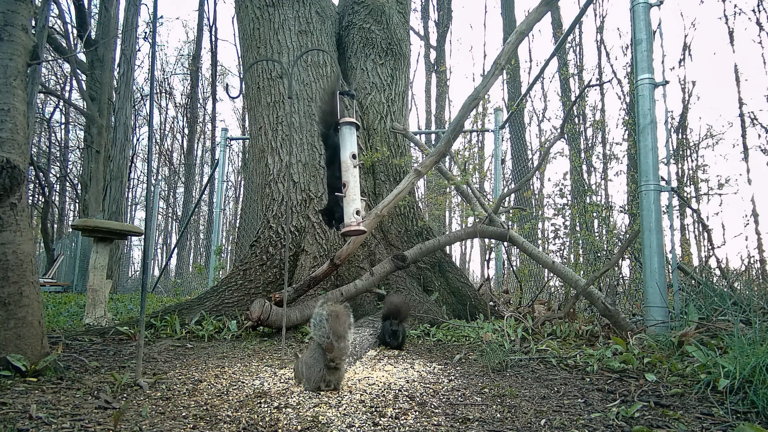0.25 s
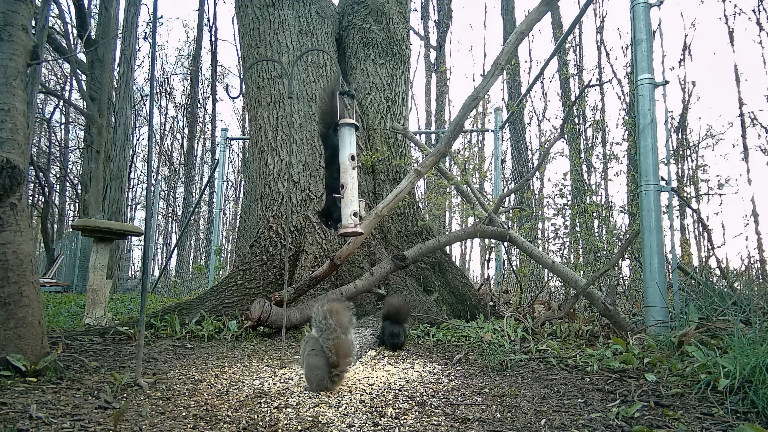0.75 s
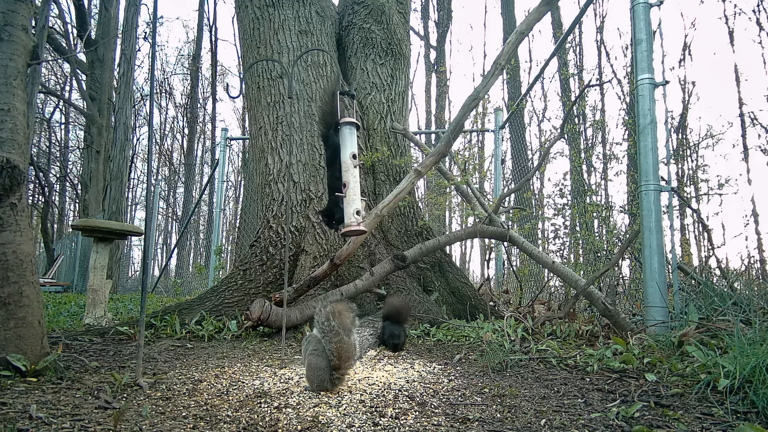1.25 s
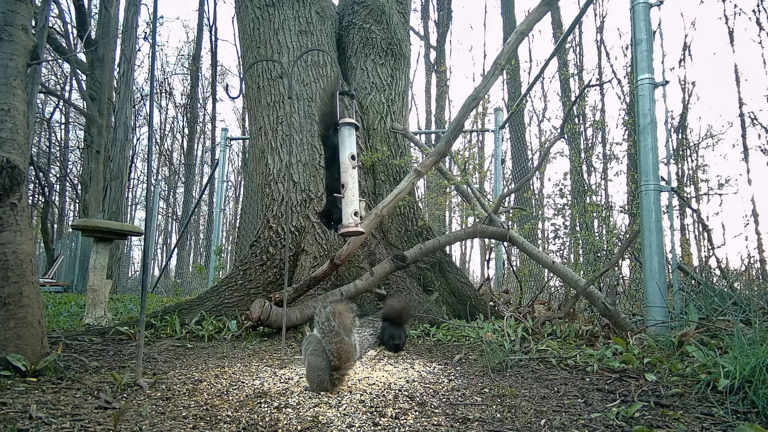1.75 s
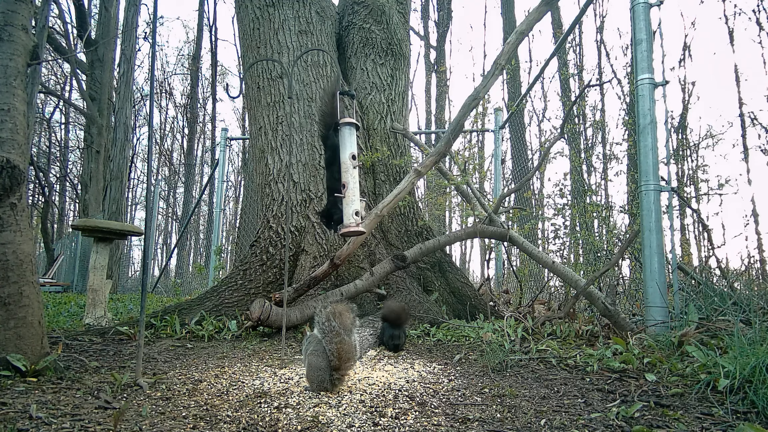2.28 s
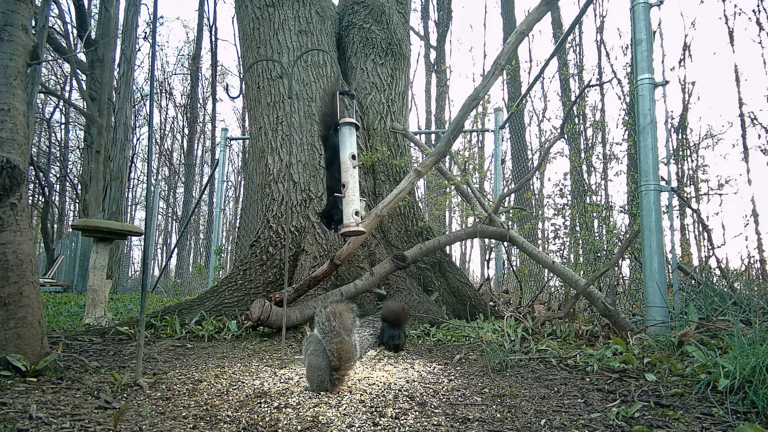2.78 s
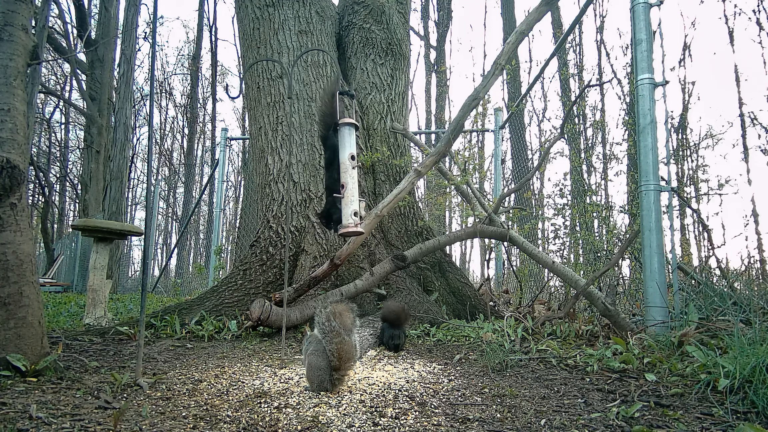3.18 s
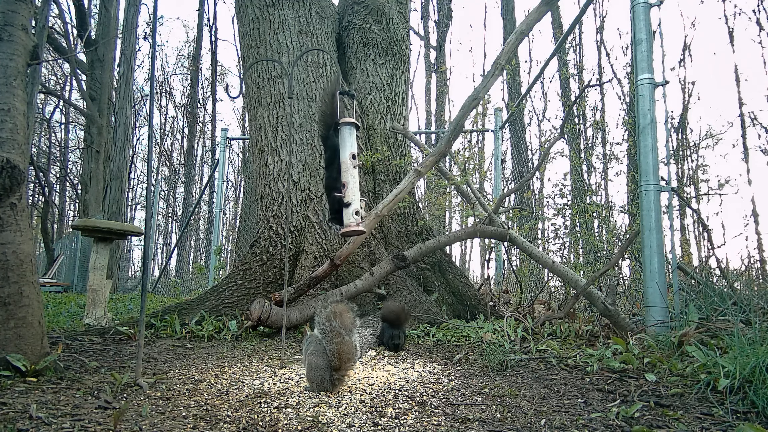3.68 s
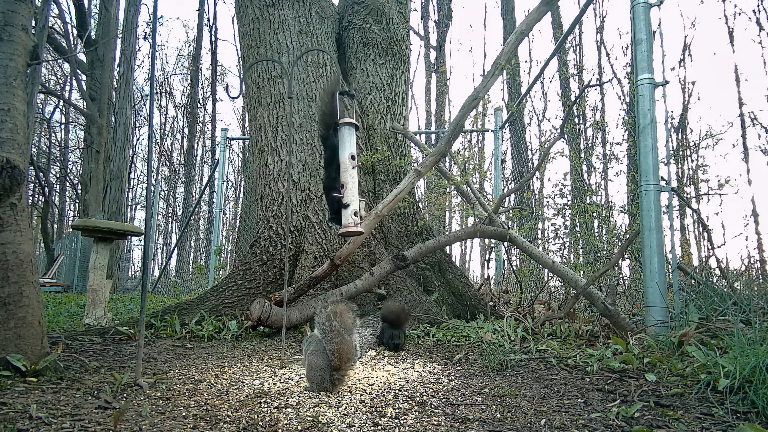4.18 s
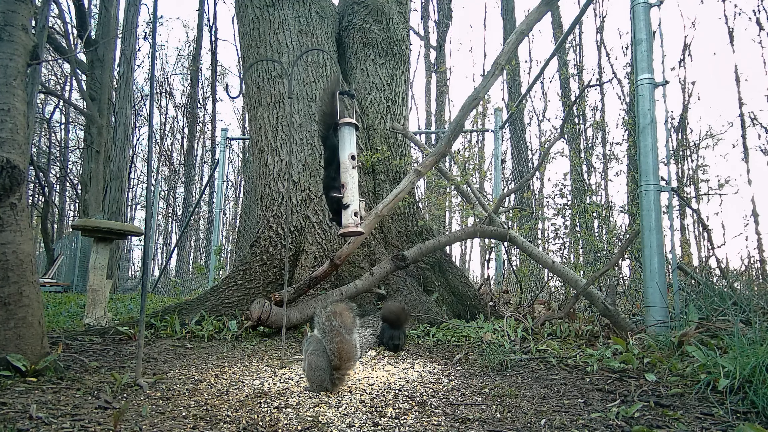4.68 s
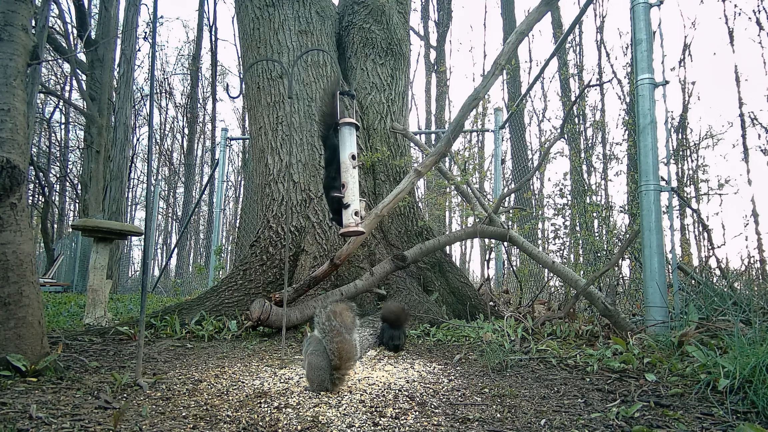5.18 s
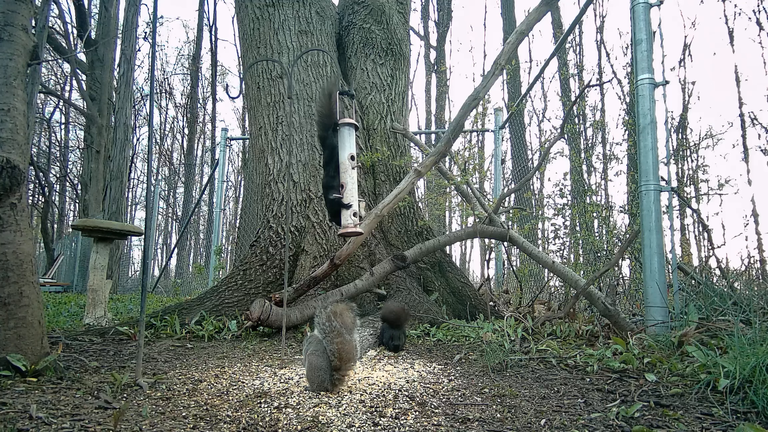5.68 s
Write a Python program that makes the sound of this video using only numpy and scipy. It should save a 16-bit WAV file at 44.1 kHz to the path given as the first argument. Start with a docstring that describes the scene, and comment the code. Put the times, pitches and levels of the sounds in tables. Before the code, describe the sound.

Distant road traffic rumbles steadily beyond a wood while squirrels close by crack seeds with a few small, sharp clicks.

```python
"""A road some way off, heard from a feeding place in a wood.
Rolling tyres make a steady wash over the low rumble of many engines. Single exhaust notes swell
and fade, and a lorry comes out from behind the trees, slowly sinking in pitch.
Close by, squirrels crack seeds and nibble: fibres snap and the husks ring briefly."""
import sys
import numpy as np
from scipy import signal
from scipy.fft import rfft, irfft
from scipy.io import wavfile

SR = 44100
rng = np.random.default_rng(int(sys.argv[2]) if len(sys.argv) > 2 else 0)


def pcm_store(signal):
    """Save signal as 16-bit PCM."""
    levels = np.round(np.clip(np.atleast_2d(signal), -1, 1) * 32767)
    wavfile.write(sys.argv[1], SR, levels.astype(np.int16).T)


N = 261954
TIME = np.arange(N) / SR


def road(flutter_db, throb_db):
    """Tyre wash, dulled by distance, over a rumble that throbs as engines beat together."""
    # tone colour of all the tyres on the road: f/Hz, relative level/dB
    tyre_spectrum = [(240, -32.5), (400, -5), (449, -1.5), (581, -4.5), (890, 0), (1380, -6), (1910, -7.5),
                     (2730, -19.5), (3110, -20.5), (4890, -32.5), (5630, -37), (6240, -39), (7190, -42),
                     (7580, -44.5), (8730, -66), (11300, -88), (19200, -120)]
    # tone colour of many far engines: f/Hz, relative level/dB
    rumble_spectrum = [(15, -22), (28, -10), (40, -9), (54, -3), (75, 1), (105, 0), (150, -2.5),
                       (190, -8.5), (250, -10), (300, -16), (340, -13.5), (385, -25), (500, -32)]
    wash_db = -39 + 0.2371 * TIME  # grows very slowly
    rumble_db = -28 - 4 * np.maximum(.8 - TIME, 0)  # builds up for 0.8 s, then holds
    wash = from_db(wash_db + flutter_db * drift(4.4)) * coloured_noise(tyre_spectrum)
    rumble = from_db(rumble_db + throb_db * drift(5.5)) * coloured_noise(rumble_spectrum)
    return wash + rumble


def exhaust_notes():
    """Single exhaust and engine notes rise out of the rumble and sink back."""
    # one note a row: loudest at t/s, half length/s, f/Hz, pitch glide/(Hz per s), level/dB
    notes = [(0.252, 0.48, 275.4, 1, -46), (.92, 0.2, 328.3, 0, -41), (1.144, 0.28, 84.1, -2.5, -26),
             (1.9, 1.22, 347, .5, -52), (2.252, .55, 83.57, -1, -24), (2.497, 0.56, 637, .5, -51),
             (2.545, 0.57, 134.2, -2.5, -29.5), (3.2, 0.52, 317.4, 0, -48), (3.503, 0.49, 97.16, -1, -35),
             (3.704, 0.66, 448.3, -5.5, -51.5), (3.9, 0.39, 121.8, 0, -33.5), (3.994, 0.22, 233, 1, -35.5),
             (4.0, 0.36, 78.5, 2.5, -32), (4.499, 0.47, 129.6, -2.5, -27.5), (4.578, 0.2, 444, -4, -43),
             (4.699, 0.54, 80.7, 1.5, -24.5), (4.85, 0.32, 306.2, 0.5, -44), (5.201, 0.79, 442.6, 0.5, -51),
             (5.397, 0.21, 329, 0.5, -39), (5.8, 0.19, 86.3, 0, -29)]
    out = np.zeros(N)
    for loudest_s, half_s, hz, glide, level_db in notes:
        offset_s = TIME - loudest_s
        swell = np.cos(np.pi / 2 * np.clip(offset_s / half_s, -1, 1))
        out += from_db(level_db) * swell * far_tone(hz + glide * offset_s, scatter=.2, fade_hz=4)
    return out


def lorry(open_s, hidden_s, roar_db):
    """A slowing engine hums and roars, louder in the open and softer behind the trees."""
    # engine tones: multiple of the engine's turn rate, relative level/dB
    engine_tones = [(4, -8.5), (6, -6), (7, -3.5), (8, -7), (9, -0.5), (10, -7), (12, -11.5), (13, -16)]
    # rough roar of burning fuel: f/Hz, relative level/dB
    roar_spectrum = [(110, -12.5), (160, -4.5), (210, 5), (255, 1), (290, -11), (330, -12.5), (380, -17.5),
                     (600, -30.5)]
    turns_hz = 25.71 - .5 * (TIME - open_s)
    tree_loss_db = 21 * np.maximum(open_s - TIME, 0) + 9 * np.maximum(TIME - hidden_s, 0)
    gain = from_db(-52) + from_db(-29 - tree_loss_db)  # a faint part always gets through
    hum = sum(from_db(db) * far_tone(k * turns_hz, scatter=.3, fade_hz=3) for k, db in engine_tones)
    roar = from_db(roar_db) * coloured_noise(roar_spectrum)
    return gain * (rms_one(hum) + roar)


def squirrels(nibbles_per_s, nibble_db, snap_db, husk_db, echo_db, top_hz):
    """Seed cracks and faint nibbles: fibres snap, the husk rings, ground and trunks echo briefly."""
    # seed cracks: t/s, click level/dB, extra level for the snap and the highest husk tones/dB
    cracks = [(.2940, -29.5, 2.5), (.7098, -55, 5.5), (.9392, -43, -12), (1.4406, -29, -18),
              (1.4495, -51, 4.5), (1.7609, -53, 0), (1.952, -53.5, 0), (1.9579, -48, 2), (3.0111, -57, 1),
              (3.0601, -52, 5), (3.7564, -53, 4), (5.453, -50, -4), (5.9082, -50, -1)]
    # ringing tones of a husk: f/Hz, relative level/dB, time to fade by 60 dB/s
    husk_tones = [(3450, -10, .005), (4200, -14, .004), (5480, -5, .012), (5680, -3, .007),
                  (6650, -4, .004), (7080, -3, .006), (7400, -4, .006)]
    crack_s, click_db, bright_db = np.transpose(cracks)
    starts = (crack_s * SR).astype(int)
    bites = rng.random(N) < nibbles_per_s / SR
    nibbles = bites * from_db(nibble_db + 3 * rng.standard_normal(N))
    low_clicks, high_clicks = nibbles.copy(), nibbles.copy()
    low_clicks[starts] = from_db(click_db)
    high_clicks[starts] = from_db(click_db + bright_db)
    out = from_db(snap_db) * smear(high_clicks, fade_s=.01)
    for k, (hz, level_db, fade_s) in enumerate(husk_tones):
        clicks = high_clicks if hz > 6200 else low_clicks
        out += (-1) ** k * from_db(level_db + husk_db) * ring(clicks, hz, fade_s)
    echo = from_db(echo_db) * smear(out, fade_s=.05)
    return signal.sosfilt(signal.butter(8, top_hz, fs=SR, output="sos"), out + echo)


def far_tone(hz, scatter, fade_hz):
    """A tone arrives by many shifting paths: a steady part plus a part that wavers."""
    phase = 2 * np.pi * np.cumsum(hz) / SR + rng.uniform(0, 2 * np.pi)
    wavering = drift(fade_hz) * np.sin(phase) + drift(fade_hz) * np.cos(phase)
    return rms_one(np.sin(phase) + scatter * wavering)


def ring(clicks, hz, fade_s):
    """Each click starts a pure tone that dies away by 60 dB in fade_s."""
    decay = from_db(-60 / (fade_s * SR))
    angle = 2 * np.pi * hz / SR
    return signal.lfilter([0, np.sin(angle)], [1, -2 * decay * np.cos(angle), decay ** 2], clicks + 1e-18)


def smear(x, fade_s):
    """Spread each click into a dying burst of noise with the same energy."""
    age = TIME[:SR // 5]
    burst = rng.standard_normal(len(age)) * from_db(-60 * age / fade_s)
    return signal.fftconvolve(x, burst / np.sqrt(np.sum(burst ** 2)))[:N]


def coloured_noise(spectrum):
    """Noise of strength 1 with the given tone colour, falling away beyond the table's ends."""
    hz, db = np.transpose(spectrum)
    f = np.maximum(np.arange(N // 2 + 1) * SR / N, 1)
    ends = np.minimum(f / hz[0], 1) ** 2 * np.minimum(hz[-1] / f, 1) ** 2
    gain = from_db(np.interp(np.log(f), np.log(hz), db)) * ends
    return rms_one(irfft(rfft(rng.standard_normal(N)) * gain, N))


def drift(rate_hz):
    """A slow random wander of typical size 1: noise smoothed twice."""
    step = 100  # samples between random values
    decay = np.exp(-2 * np.pi * rate_hz * step / SR)
    noise = rng.standard_normal(N // step + 1002)
    slow = signal.lfilter([1], [1, -2 * decay, decay ** 2], noise)[1000:]
    return np.interp(np.arange(N) / step, np.arange(len(slow)), rms_one(slow))


def from_db(db):
    """Turn decibels into a factor to multiply by."""
    return 10 ** (np.asarray(db) / 20)


def rms_one(x):
    """Scale a sound to an average strength (rms) of 1."""
    return x / np.sqrt(np.mean(x ** 2) + 1e-20)


def scene():
    """Far traffic and near squirrels in one channel."""
    traffic = road(flutter_db=.53, throb_db=.94)
    traffic += lorry(open_s=4.45, hidden_s=5.5, roar_db=-5)
    traffic += exhaust_notes()
    feeding = squirrels(nibbles_per_s=5, nibble_db=-62.5, snap_db=2, husk_db=-.5,
                        echo_db=-5.5, top_hz=7700)
    return (traffic + feeding)[None]


def record(dry):
    """Cut the treble steeply above 8850 Hz."""
    return signal.sosfilt(signal.ellip(10, .1, 80, 8850, fs=SR, output="sos"), dry)


dry = scene()
out = record(dry)
pcm_store(out)
```